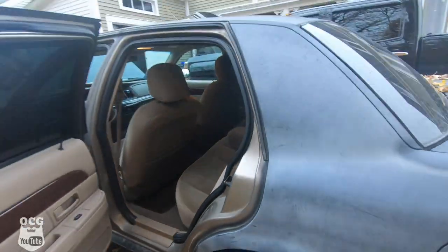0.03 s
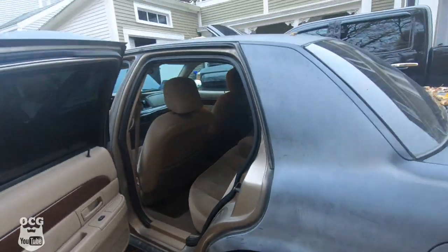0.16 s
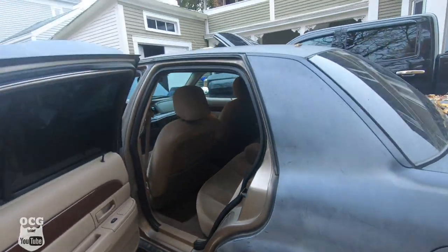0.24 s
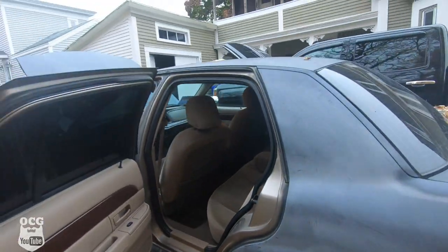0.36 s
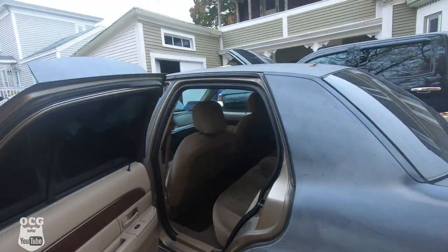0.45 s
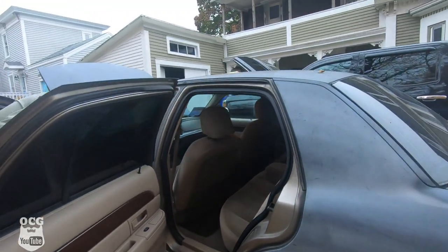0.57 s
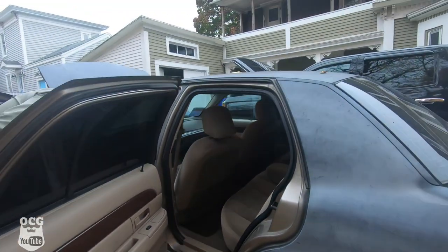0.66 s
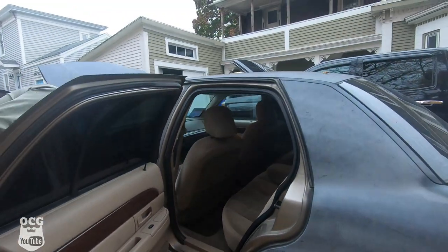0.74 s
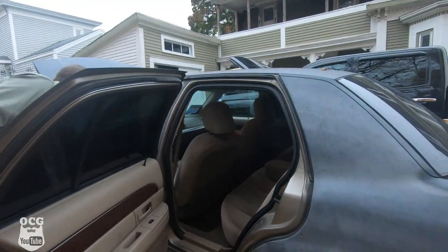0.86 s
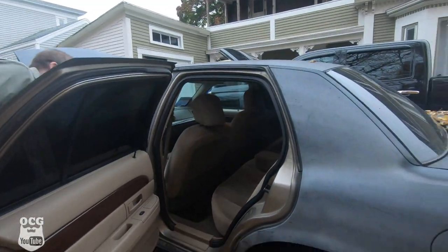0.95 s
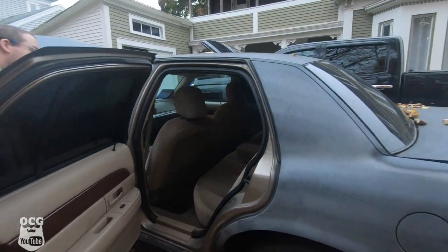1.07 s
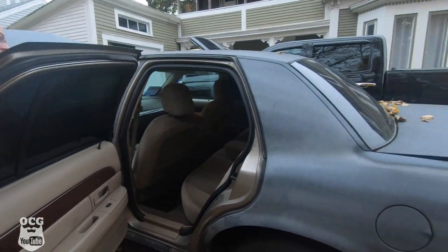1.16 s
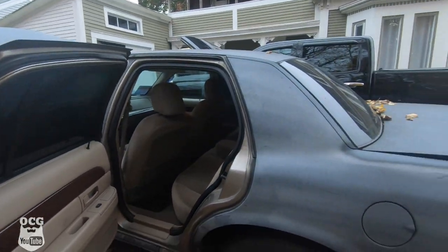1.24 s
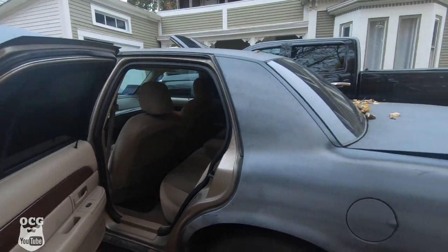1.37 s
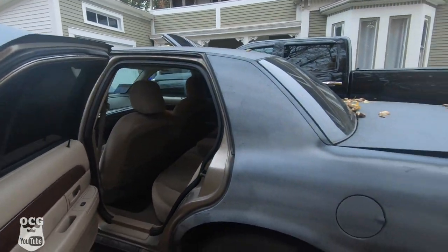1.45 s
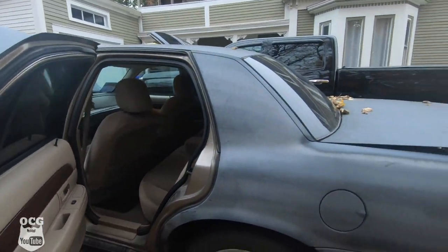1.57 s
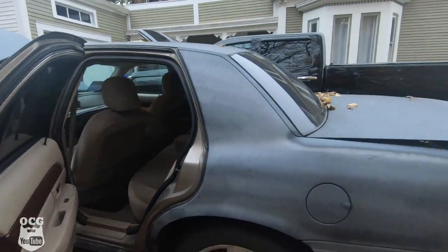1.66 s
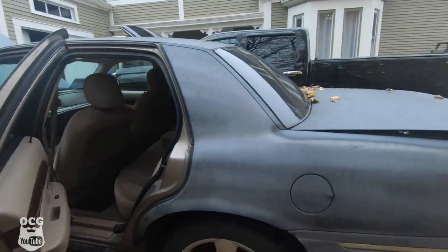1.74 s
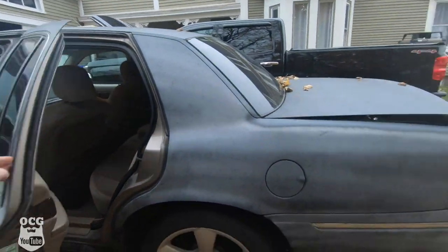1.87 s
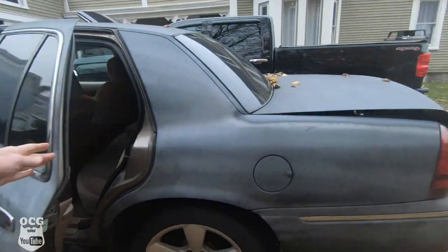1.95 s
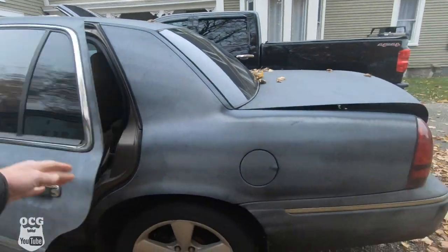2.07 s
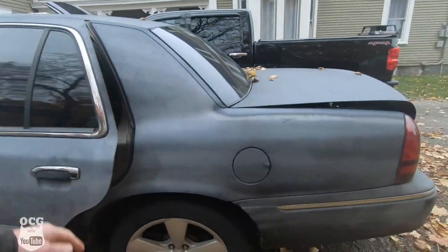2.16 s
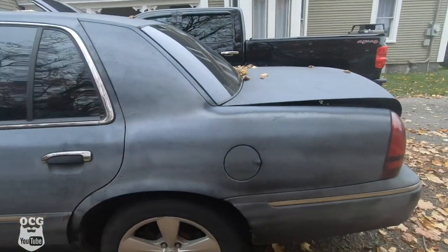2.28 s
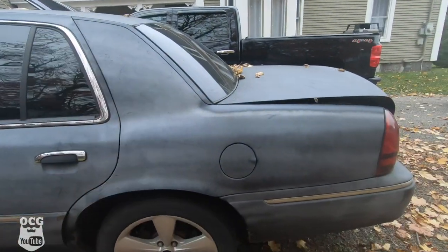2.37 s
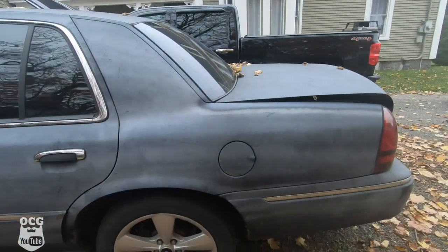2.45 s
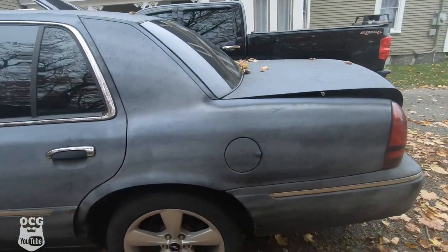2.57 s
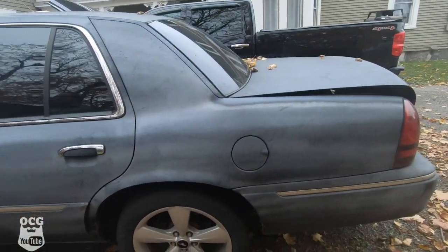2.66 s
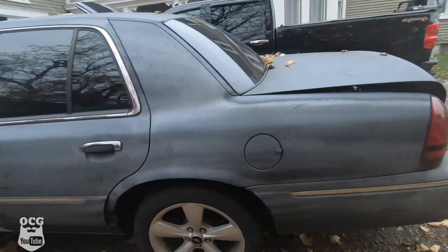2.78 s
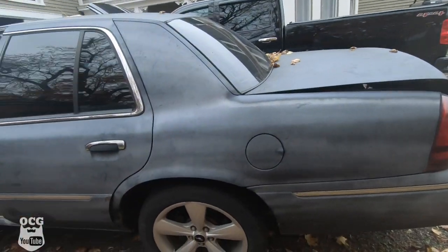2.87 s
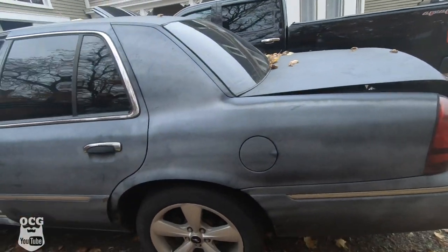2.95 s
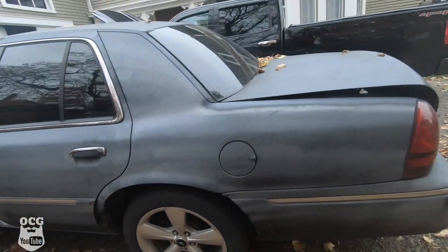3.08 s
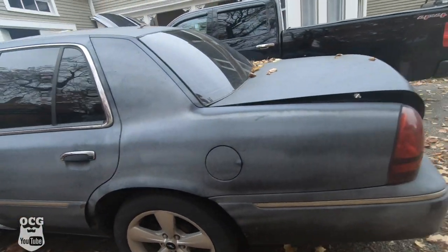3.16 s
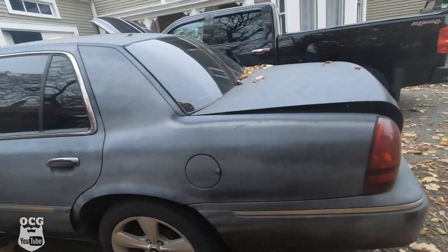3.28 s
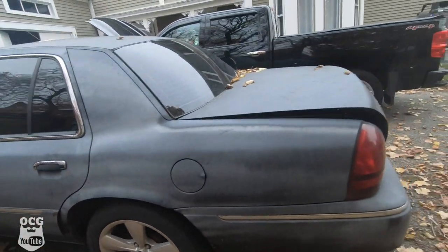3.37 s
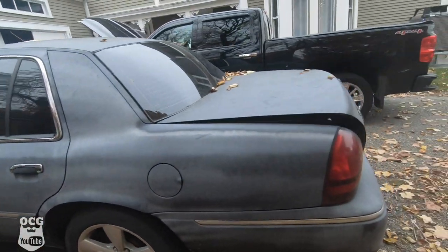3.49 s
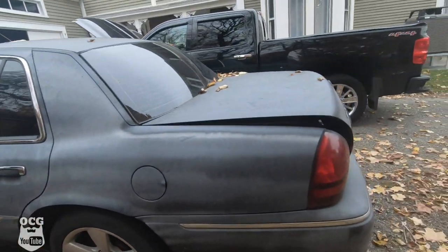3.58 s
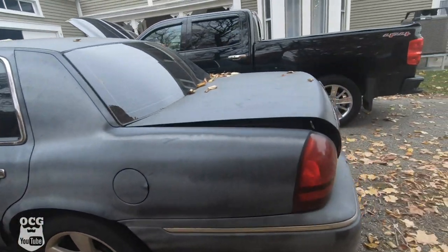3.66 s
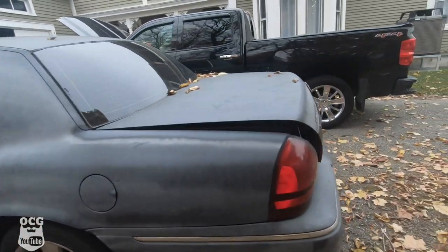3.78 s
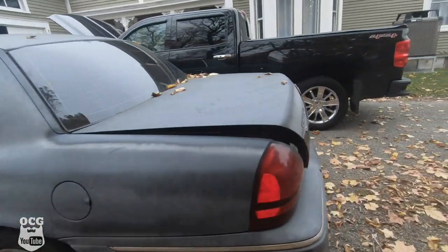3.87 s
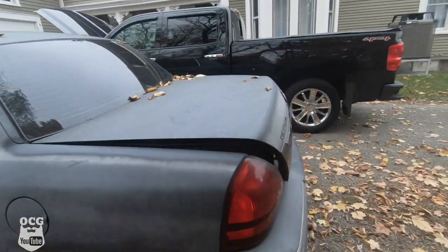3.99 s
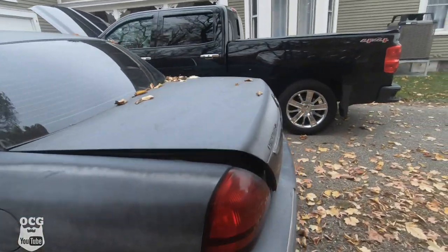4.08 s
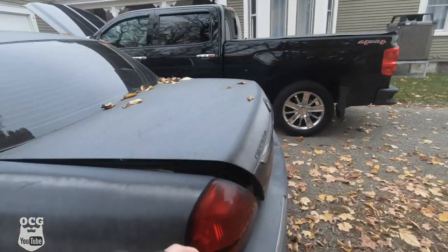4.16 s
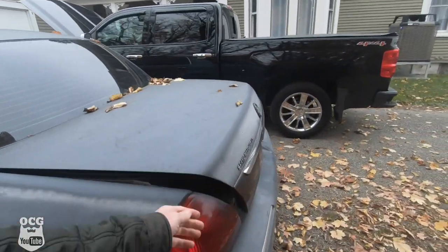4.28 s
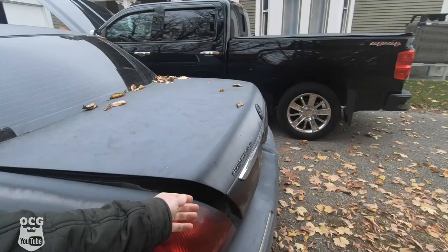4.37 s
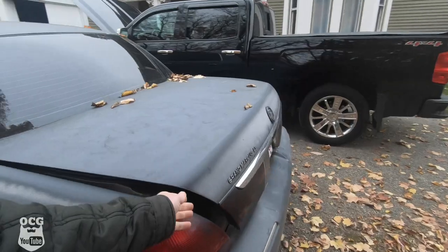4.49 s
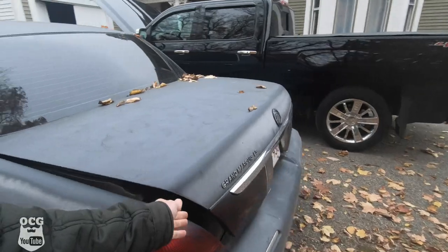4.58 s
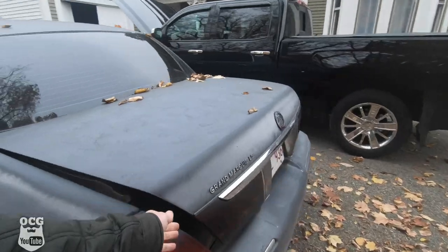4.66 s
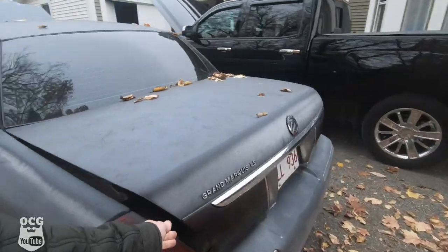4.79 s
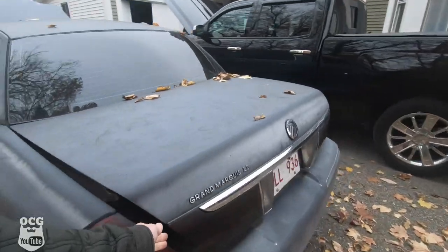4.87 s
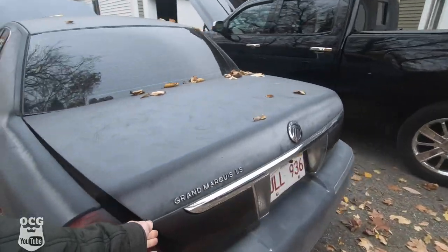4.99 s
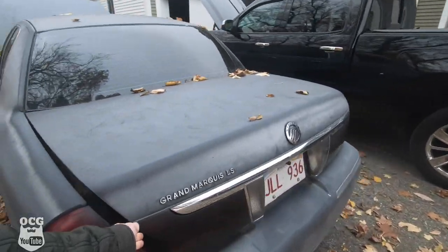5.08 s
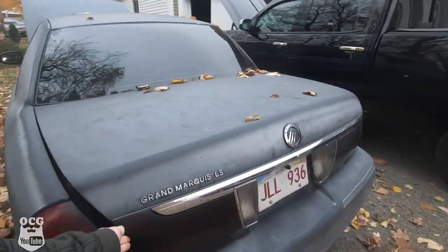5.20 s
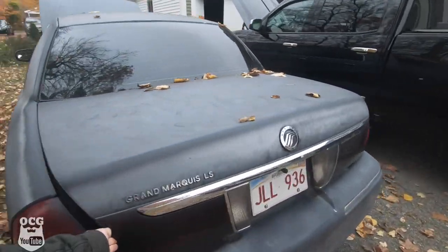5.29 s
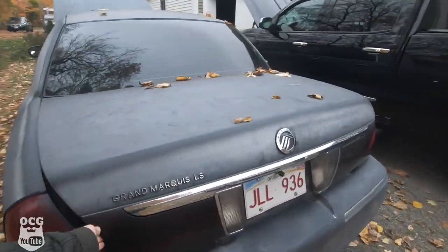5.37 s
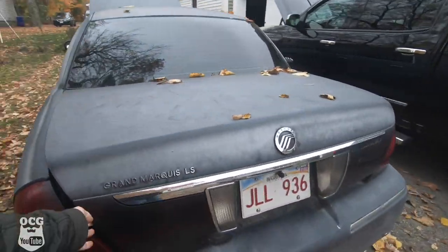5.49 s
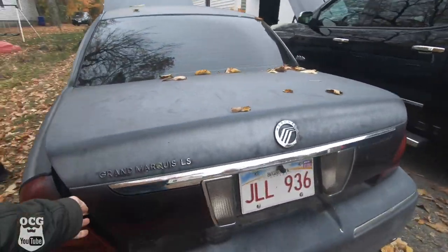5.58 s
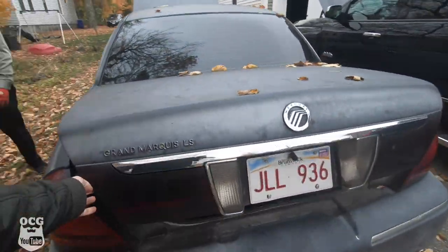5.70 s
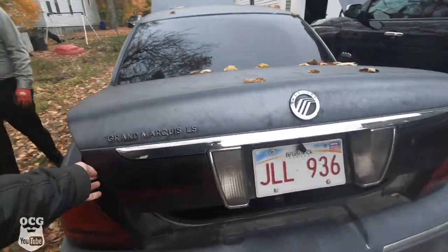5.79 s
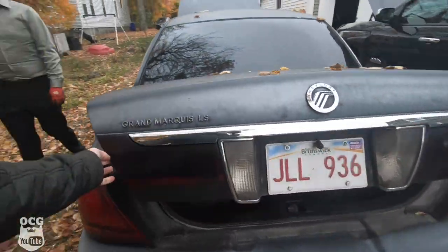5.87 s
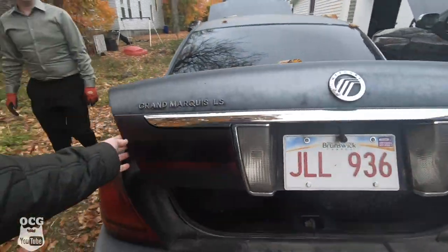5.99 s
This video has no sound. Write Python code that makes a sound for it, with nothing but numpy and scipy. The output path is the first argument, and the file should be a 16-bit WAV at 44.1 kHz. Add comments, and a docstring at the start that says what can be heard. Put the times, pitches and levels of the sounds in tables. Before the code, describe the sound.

Outdoors beside a parked car, with a handheld microphone. A faint clack and soft jacket swishing come first, then a near door slams with a deep, solid metallic thunk. Small taps and dry ticks follow, and a farther door shuts more quietly. After a cluster of ticks, the trunk lid pops free, its hinge squeaking briefly and its seal scraping. Low wind and handling rumble swell unevenly over faint distant traffic.

```python
"""Outdoors by a parked car, microphone in the hand: a clack, a near door slams, a farther door shuts,
a trunk lid creaks up. Blows ring sheet-metal modes; the hinge sticks and slips, the seal scrapes.
Small taps and dry ticks are short resonant bursts, with one metal ping and a hollow rub a little way off.
A nylon jacket swishes close by as grainy noise, with leaves crackling under its strokes.
Wind and handling rumble in the microphone, over a noise bed of far traffic and air."""
import sys
import numpy as np
from scipy import signal
from scipy.fft import rfft, irfft, next_fast_len
from scipy.io import wavfile
from scipy.ndimage import uniform_filter1d

SR = 44100
rng = np.random.default_rng(int(sys.argv[2]) if len(sys.argv) > 2 else 0)


def output_pcm(signal):
    """Save a mono or channel-first signal as 16-bit PCM at the path in sys.argv[1].

    Samples are clipped to [-1, 1] before scaling.
    """
    pcm = np.clip(np.atleast_2d(signal).T, -1, 1) * 32767
    wavfile.write(sys.argv[1], SR, np.round(pcm).astype(np.int16))


N = 266231

# Blows on the panels: (time [s], level [dB], centre [Hz], spread [octaves])
NEAR_BLOWS = [(2.116, -26, 2780, 1.65), (2.126, -25.5, 1700, 1.5), (2.133, -12.5, 400, 0.74),
              (2.1335, -13.5, 1680, 0.87), (2.135, -16, 3900, 0.41), (2.1455, -14.5, 47.4, 1.74),
              (2.164, -38.5, 5000, 1.3), (2.207, -46, 2980, 1.1), (2.226, -45.5, 2760, 0.62),
              (2.292, -39, 780, 0.52), (2.341, -38.5, 760, 0.46)]
FAR_BLOWS = [(4.0335, -22, 5730, 0.3), (4.038, -28, 875, 2.13), (4.0465, -18, 109, 1.18),
             (4.058, -30.5, 607, 2), (4.075, -32.5, 400, 0.83), (4.093, -27, 157, 1.53),
             (4.098, -43.5, 4050, 0.79), (4.125, -42.5, 1100, 0.87)]
CLACK_BLOWS = [(.369, -36, 2060, 1.5), (.377, -36, 830, 1.73), (.395, -39.5, 200, 1.2),
               (.462, -55.5, 1408, 1.4), (.6445, -54.5, 3000, 2.2), (.65, -49, 1035, 1.84)]
# The lid jumps off its seal: (time [s], level [dB], centre [Hz], spread [octaves])
LID_BLOWS = [(5.5425, -36, 1500, 1), (5.562, -39, 1100, 1.7), (5.59, -41, 1200, 1.44)]
# Strongest modes of each part: (frequency [Hz], relative level [dB], t60 [s])
NEAR_DOOR_MODES = [(25.4, 8, 0.59), (51, 9.5, 0.21), (78.3, -9, 0.7), (125.6, -3.5, 0.28), (179, 5, 0.2),
                   (222.4, 4.5, 0.19), (276.3, -1.5, 0.24), (397, 7, 0.094), (501.5, 4, 0.054),
                   (1533, -9.5, 0.099), (1920, 3, 0.039)]
FAR_DOOR_MODES = [(24.1, 11, 0.52), (52, 5.5, 0.67), (79.8, -4.5, 0.65), (124.6, 5.5, 0.2),
                  (167.5, -3.5, 0.31), (320, -23, 0.21), (404, 7.5, 0.061), (520, -1, 0.071),
                  (611, -12, 0.17)]
CLACK_MODES = [(99.6, 10, 0.39), (171, 7.5, 0.049), (347, 10.5, 0.044), (655, -1, 0.17), (1024, 6, 0.032),
               (1950, 10.5, 0.011)]
SPRING_MODES = [(252, 4, 0.13), (653, 4, 0.27), (1528, -1, 0.23), (3200, 0, 0.11)]
# Dense sheet-metal modes, before each panel's damping: (frequency [Hz], base t60 [s])
SHEET_T60 = [(100, 0.59), (400, 0.24), (1000, 0.15), (2000, 0.1), (4000, 0.077), (8000, 0.084),
             (16000, 0.071)]

# Hinge slip runs, quickening as the lid gathers speed: (start [s], length [s], first rate [slips/s],
# last rate [slips/s], level [dB], roughness [0-1], extra level of upper multiples [dB])
SQUEAKS = [(5.363, 0.14, 336, 780, -49.5, 0.2, -8.5), (5.378, 0.047, 503, 508, -56.5, 0.04, 10.5),
           (5.604, 0.093, 405, 506, -39, 0.13, 0.5), (5.681, 0.1, 516, 546, -35.5, .05, -0.5),
           (5.764, 0.071, 550, 585, -44.5, 0.14, -8), (5.811, 0.074, 670, 700, -46.5, 0.18, 1.5)]
SQUEAK_EDGE = 0.33  # share of a run spent catching and letting go
# What the hinge arm radiates: (frequency [Hz], level [dB])
HINGE_ARM = [(450, -2.5), (750, 1), (1050, -12), (1550, -4.5), (1900, -11), (2500, -20), (3200, -22),
             (4500, -33)]
# Seal and springs scrape as the lid lifts: (peak [s], rise [s], fall [s], level [dB])
SCRAPES = [(5.551, 0.017, .11, -36.5), (5.78, 0.17, 0.62, -47), (5.976, 0.044, 0.045, -42.5)]
SCRAPE_DROP_DB, SCRAPE_FLATNESS = 20, 2.05
# Lid resonances: (frequency [Hz], nominal width [Hz], relative level [dB])
LID_RESONANCES = [(200, 240, 4), (626, 240, 1), (1010, 52, -15), (1500, 200, -3)]
LID_WIDTH_SCALE = 0.94  # on the nominal widths

# Dull taps of shoes and trim; the last two rows form a rising scrape at the lid:
# (time [s], level [dB], frequency [Hz], t60 [s])
TAPS = [(.532, -35.5, 563, 0.026), (.735, -37.5, 614, 0.06), (1.6, -46.5, 295, 0.16),
        (2.374, -46, 505, 0.037), (2.6195, -34.5, 626, 0.044), (2.646, -37, 600, 0.077),
        (2.96, -37, 373, 0.085), (3.392, -37.5, 407, 0.15), (3.485, -42.5, 433, .05),
        (3.61, -42.5, 530, .06), (3.612, -44, 1275, 0.085), (3.838, -34, 104, 0.049),
        (4.828, -44, 1000, 0.041), (5.885, -36.5, 636, 0.1), (5.95, -34.5, 400, 0.14),
        (5.962, -33.5, 1290, 0.11), (5.982, -32, 1670, 0.064)]
# Dry ticks of leaves and latch: (time [s], level [dB], frequency [Hz])
TICKS = [(0.932, -37, 2190), (2.414, -52.5, 4490), (2.843, -38, 3860), (3.112, -43, 1950),
         (3.392, -37, 3750), (4.662, -38.5, 3260), (4.8073, -31, 2600), (4.8073, -43, 1590),
         (4.906, -38, 2960), (4.9266, -38.5, 3030), (4.954, -34.5, 2600), (4.964, -33, 2470),
         (5.017, -37.5, 2400), (5.461, -38.5, 3780), (5.482, -37, 3330), (5.502, -40, 3700)]
TICK_T60 = 0.029  # s
# A small metal part rings: (time [s], level [dB], frequency [Hz], t60 [s])
PINGS = [(3.566, -40, 5280, .045)]
# Something hollow is rubbed a little way off: (peak [s], rise [s], fall [s], level [dB])
RUB_STROKE = (3.27, .09, .1, -55)
RUB_DROP_DB, RUB_FLATNESS = 10, 3.0
# Its resonances: (frequency [Hz], width of the first of two passes [Hz], relative level [dB])
HOLLOW = [(375, 76, 0.5), (560, 28, -3.5), (860, 42, -5)]

# Jacket strokes: (peak [s], rise [s], fall [s], level [dB], scuff over swish [dB])
STROKES = [(.03, 0.23, 0.29, -50.5, -11.5), (.25, 0.14, 0.5, -54.5, -3.5), (.83, 0.082, 0.25, -51, -14),
           (0.968, 0.27, 0.46, -51, -9), (1.58, 0.16, 0.16, -58, -14), (1.84, 0.28, 0.1, -58, -31),
           (2.698, 0.38, 0.86, -50, -7.5), (3.15, 0.055, 0.077, -61, -1.5), (3.64, 0.16, 0.26, -58, -0.5),
           (3.88, 0.17, 0.14, -53.5, -8.5), (4.277, 0.038, 0.12, -50, -1), (4.5, 0.46, 0.6, -58.5, -2.5),
           (5.021, 0.14, 0.15, -50, -2), (5.25, 0.14, 0.26, -55.5, -6.5), (5.564, 0.074, 0.079, -47.5, -10),
           (5.98, 0.26, 0.084, -53, -23)]
STROKE_DROP_DB, STROKE_FLATNESS = 29.5, 2.24  # fall at a stroke's ends; higher holds the top longer
REST_DB, REST_DULL_DB = -66.5, -2.5  # cloth between strokes: swish level, scuff over swish
CRACKLE_PER_S, CRACKLE_DB = 70.0, -9.0  # dry leaves snapping; level relative to the swish
PATCHY_DB = 1.6  # rms drift as folds of the cloth colour the swish in patches
# Spectra of bright swish and dull scuff: (frequency [Hz], relative density [dB per Hz])
SWISH = [(880, -5), (1500, -3), (2370, -3), (3730, 3.5), (5770, 3), (12100, -10), (16000, -16.5)]
SCUFF = [(120, 1.5), (300, 1.5), (700, 2.5), (1500, 4), (2500, -3.5), (5000, -32), (12000, -107)]

# Wind on the microphone: (time [s], buffeting level [dB], flutter level [dB])
WIND = [(0, -32, -39), (1.1, -24, -39.5), (1.3, -17, -32), (1.55, -25, -41.5), (1.85, -21, -43.5),
        (2.3, -30, -39.5), (3.0, -26.5, -38.5), (3.8, -21, -41), (4.2, -31, -41), (4.6, -16.5, -39.5),
        (4.95, -31.5, -44), (5.17, -7.5, -40), (5.5, -26.5, -41.5), (5.95, -17, -42)]
# Wind spectra: (frequency [Hz], relative density [dB per Hz])
BUFFET = [(1.5, 23), (3, 7.5), (7, 13.5), (14, 7), (24, -8.5), (40, -84), (150, -130)]
FLUTTER = [(10, -50.5), (24, 4.5), (45, 0.5), (80, -12.5), (130, -24.5), (250, -37), (1500, -110)]
# Far traffic and air: (frequency [Hz], relative density [dB per Hz])
YARD = [(60, -28.5), (100, 2), (300, -1), (700, -7), (1500, -19.5), (3000, -39.5), (16000, -69)]
YARD_DB = -61  # rms level
EDGE_HZ = 15850  # band limit


def panel(blows, modes, dense_db, damping):
    """Each blow rings strong modes and a dense crowd of weak ones; its centre and spread weight both."""
    hz, db, t60 = np.transpose(modes)
    t = np.arange(SR // 2) / SR
    decay = amp(db[:, None] - 60 * t / t60[:, None])
    rings = decay * np.sin(2 * np.pi * hz[:, None] * t)
    bins = np.fft.rfftfreq(256, 1 / SR) + 10.0
    frames = np.arange(len(t) // 64 + 2) * 64 / SR
    dying_db = -60 * frames / read(SHEET_T60, bins)[:, None]
    # most modes are damped fast by trim and seals, a few ring on
    fade = amp(dying_db / damping) + amp(-18.5 + dying_db / 2.34)
    fade = fade / np.sqrt(0.62 + bins / 1000)[:, None]
    onset = 1 - np.exp(-t / 0.0004)
    out = np.zeros(N)
    for s, blow_db, centre_hz, octaves in blows:
        reach, wide = (np.exp(-0.5 * (np.log2(f / centre_hz) / octaves) ** 2) for f in (hz, bins))
        # each mode from 140 Hz up starts with a random sign at every blow
        sign = np.where(hz < 140, 1, rng.choice([-1.0, 1.0], len(hz)))
        z = rng.standard_normal(fade.shape) + 1j * rng.standard_normal(fade.shape)
        crowd = signal.istft(z * fade * wide[:, None], nperseg=256, noverlap=192)[1][:len(t)]
        strong = (reach * sign) @ rings
        add(out, s, amp(blow_db) * (strong + amp(dense_db) * crowd * onset))
    return out


def doors():
    """The near door, the farther door and the clack, each with its own modes and damping."""
    near = panel(NEAR_BLOWS, NEAR_DOOR_MODES, -3.0, 0.62)
    far = panel(FAR_BLOWS, FAR_DOOR_MODES, -11.5, 0.97)
    clack = panel(CLACK_BLOWS, CLACK_MODES, -0.32, 0.96)
    return near + far + clack


def lid():
    """The hinge squeaks while rubber and springs scrape into the lid's resonances."""
    grain = grainy(300.0, 1.3, 0.36)
    body = sum(amp(db) * resonate(grain, hz, LID_WIDTH_SCALE * width) for hz, width, db in LID_RESONANCES)
    body = evened(body) + amp(4.0) * colour(grain, SCUFF)
    scraping = sum(swell(*row, SCRAPE_DROP_DB, SCRAPE_FLATNESS) for row in SCRAPES)
    lifting = np.arange(N) / SR > SCRAPES[0][0] - SCRAPES[0][1]  # silent before the first scrape
    out = scraping * lifting * evened(body)
    out += panel(LID_BLOWS, SPRING_MODES, -5.0, 1.0)
    for row in SQUEAKS:
        add(out, row[0], squeak(*row[1:]))
    return out


def squeak(length, first_hz, last_hz, db, rough, upper_db):
    """Stick and slip at an unsteady rate; its multiples slide through the arm's fixed resonances."""
    t = np.arange(0, length, 1 / SR)
    hz = first_hz + (last_hz - first_hz) * t / length
    shake, *flickers = (evened(uniform_filter1d(rng.standard_normal(len(t)), 250)) for _ in range(9))
    turns = np.cumsum(hz * (1 + 0.15 * rough * shake)) / SR
    tone = np.zeros(len(t))
    for k, flicker in enumerate(flickers, 1):
        gain = amp(read(HINGE_ARM, k * hz) + upper_db * (k > 1))
        # uneven slips make each multiple flicker on its own, the high ones most
        unsteady = 1 + 2.6 * rough * np.sqrt(k) * flicker
        tone += gain * unsteady * np.sin(2 * np.pi * k * turns)
    return amp(db) * tone * signal.windows.tukey(len(t), SQUEAK_EDGE)


def small_hits(rows, rise_s, width_share, wide_db, ring):
    """Each hit is a short noise burst and a dying ring sent through one broad resonance."""
    out, t = np.zeros(N), np.arange(6000) / SR
    for s, db, hz, t60 in rows:
        source = rng.standard_normal(len(t)) + ring * np.sin(2 * np.pi * hz * t)
        burst = source * (1 - np.exp(-t / rise_s)) * amp(-60 * t / t60)
        width = width_share * hz
        sound = resonate(resonate(burst, hz, width), hz, 2 * width)
        wide = signal.lfilter([0.4], [1, -0.6], burst)  # gently darkened, unresonated
        add(out, s, amp(db) * (sound / abs(sound).max() + amp(wide_db) * wide))
    return out


def taps_and_ticks():
    """Dull taps, and the scrape that ends them, rise slower and carry less ring than the dry ticks."""
    taps = small_hits(TAPS, 0.00073, 0.71, -10.0, 0.18)
    ticks = small_hits([(*row, TICK_T60) for row in TICKS], 0.00017, 0.69, -13.5, 0.43)
    return taps + ticks


def ping():
    """A small metal part rings as a single dying partial."""
    out, t = np.zeros(N), np.arange(6000) / SR
    for s, db, hz, t60 in PINGS:
        envelope = amp(db - 60 * t / t60) * (1 - np.exp(-t / 0.00092))
        add(out, s, envelope * np.sin(2 * np.pi * hz * t))
    return out


def rub():
    """Soft friction noise in a few hollow resonances."""
    noise = rng.standard_normal(N)
    body = np.zeros(N)
    for hz, width, db in HOLLOW:
        body += amp(db) * evened(resonate(resonate(noise, hz, width), hz, 2 * width))
    return swell(*RUB_STROKE, RUB_DROP_DB, RUB_FLATNESS) * evened(body)


def jacket():
    """Cloth sliding on cloth: a bright swish with leaves crackling in it, and a duller scuff."""
    grain = grainy(220.0, 2.4, 0.19)
    strokes = np.array([swell(*row[:4], STROKE_DROP_DB, STROKE_FLATNESS) for row in STROKES])
    scuff_share = amp([row[4] for row in STROKES])[:, None]
    # overlapping strokes and the resting cloth add as powers
    bright = np.sqrt((strokes ** 2).sum(0) + amp(REST_DB) ** 2)
    dull = np.sqrt(((scuff_share * strokes) ** 2).sum(0) + amp(REST_DB + REST_DULL_DB) ** 2)
    swish = patchy(colour(grain, SWISH)) + amp(CRACKLE_DB) * crackle()
    return bright * swish + dull * colour(grain, SCUFF)


def crackle():
    """Leaves snap as sparse short noise bursts in four resonant colours, some large."""
    size = amp(3.0 * np.minimum(rng.exponential(1, N), 2)) * (rng.random(N) < CRACKLE_PER_S / SR)
    kind, t = rng.integers(0, 4, N), np.arange(300) / SR
    out = np.zeros(N)
    for k, hz in enumerate((1530, 2600, 4250, 5000)):
        snap = np.exp(-t / 0.0027) * rng.standard_normal(len(t))
        snaps = np.convolve(size * (kind == k), snap)[:N]
        out += resonate(resonate(snaps, hz, 0.22 * hz), hz, hz)
    return evened(out)


def wind():
    """Slow pressure lumps at the microphone with a faster flutter on top."""
    buffet_db, flutter_db = curves(WIND)
    lumps = amp(buffet_db) * colour(rng.standard_normal(N), BUFFET)
    return lumps + amp(flutter_db) * colour(rng.standard_normal(N), FLUTTER)


def yard_air():
    """Far traffic and air as steady coloured noise."""
    return amp(YARD_DB) * colour(rng.standard_normal(N), YARD)


def swell(peak_s, rise_s, fall_s, db, drop_db, flatness):
    """Gain of one stroke: it climbs to a rounded top and sinks, drop_db down at both ends."""
    t = np.arange(N) / SR - peak_s
    away = np.where(t < 0, -t / rise_s, t / fall_s)
    return amp(db - drop_db * np.minimum(away, 4) ** flatness)


def grainy(per_s, spread_db, share):
    """Noise with sparse slips of friction in its level, a few large."""
    slips = amp(spread_db * np.minimum(rng.exponential(1, N), 4)) * (rng.random(N) < per_s / SR)
    bursts = signal.oaconvolve(slips, np.exp(-np.arange(400) / 59.0))[:N]
    return rng.standard_normal(N) * (1 - share + share * evened(bursts))


def patchy(x):
    """Random gain in patches about a thousand Hz wide and some hundredths of a second long, rms 1."""
    z = signal.stft(x, nperseg=512)[2]
    field = rng.standard_normal(z.shape)
    for axis in (0, 1):
        field = uniform_filter1d(field, size=12, axis=axis)
    return evened(signal.istft(z * amp(PATCHY_DB * evened(field)), nperseg=512)[1][:N])


def colour(x, points):
    """Gives x a spectrum, rms 1."""
    size = next_fast_len(len(x))
    gain = amp(read(points, np.fft.rfftfreq(size, 1 / SR)))
    return evened(irfft(rfft(x, size) * gain, size)[:len(x)])


def resonate(x, hz, width):
    """One fixed resonance of about unit gain at its centre, width in Hz."""
    pole = np.exp((2j * np.pi * hz - np.pi * width) / SR)
    return 2 * signal.lfilter([1 - abs(pole)], [1, -pole], x).real


def amp(db):
    """Decibels to amplitude."""
    return 10 ** (np.asarray(db) / 20)


def evened(x):
    """Scales x to rms 1."""
    return x / np.sqrt(np.mean(x ** 2) + 1e-20)


def read(points, hz):
    """Reads a table of (frequency [Hz], value) along a log frequency axis."""
    f, value = np.transpose(points)
    return np.interp(np.log(hz + 1), np.log(f + 1), value)


def curves(rows):
    """Each column as a value for every sample."""
    s, *columns = np.transpose(rows)
    return [np.interp(np.arange(N) / SR, s, c) for c in columns]


def add(mix, s, sound):
    """Adds sound into mix from time s, cut at the end."""
    part = mix[round(s * SR):][:len(sound)]
    part += sound[:len(part)]


def scene():
    """Sums the car, the small sounds, the jacket, the wind and the far bed in one channel."""
    car = doors() + lid()
    small = taps_and_ticks() + ping() + rub()
    return (car + small + jacket() + wind() + yard_air())[None]


def record(dry):
    """Peaks saturate just under full scale; then the band limit."""
    soft = dry / (1 + abs(dry / 0.97) ** 6) ** (1 / 6)
    lowpass = signal.firwin(511, EDGE_HZ, window=("kaiser", 9), fs=SR)
    return signal.oaconvolve(soft, lowpass[None], "same")


dry = scene()
out = record(dry)
output_pcm(out)
```